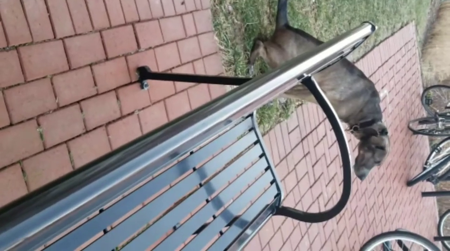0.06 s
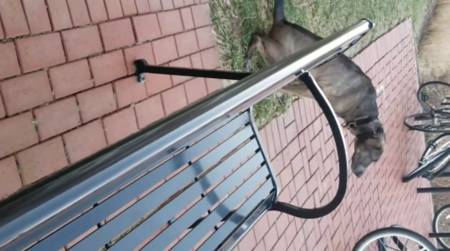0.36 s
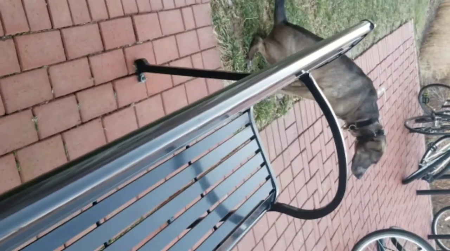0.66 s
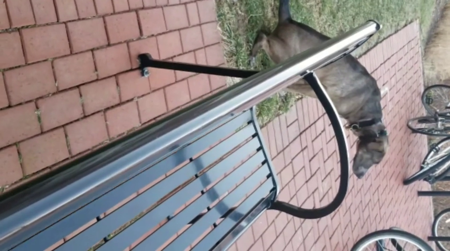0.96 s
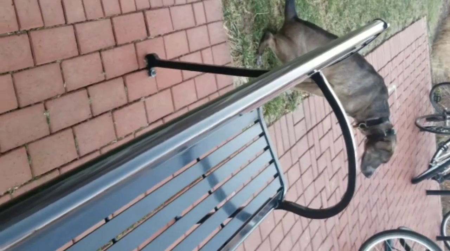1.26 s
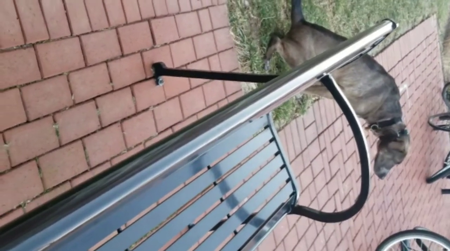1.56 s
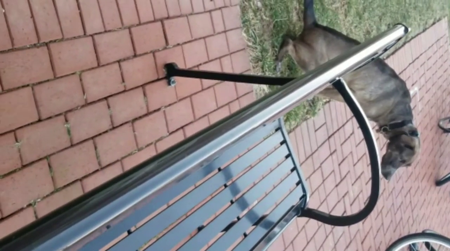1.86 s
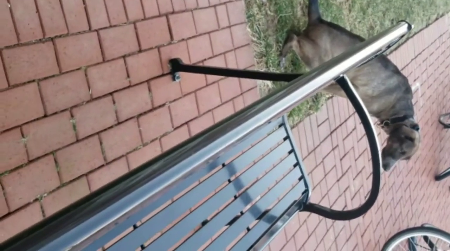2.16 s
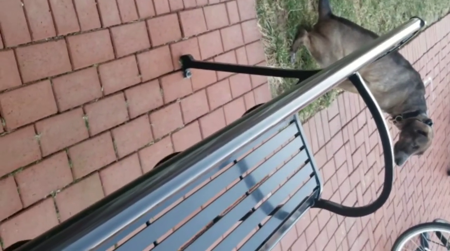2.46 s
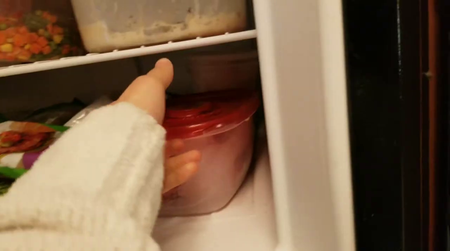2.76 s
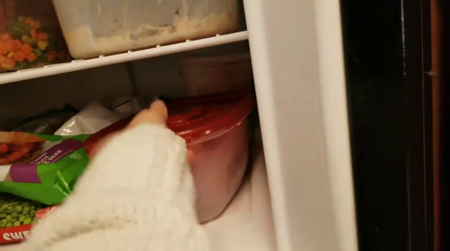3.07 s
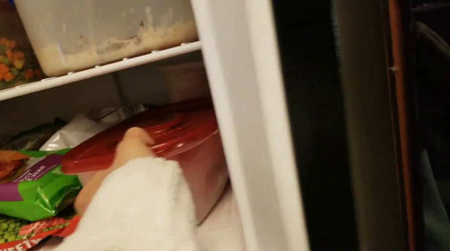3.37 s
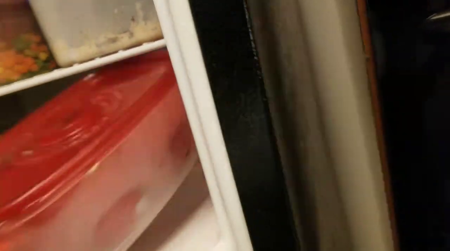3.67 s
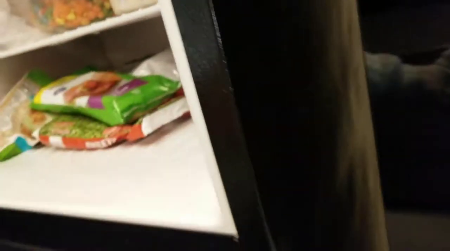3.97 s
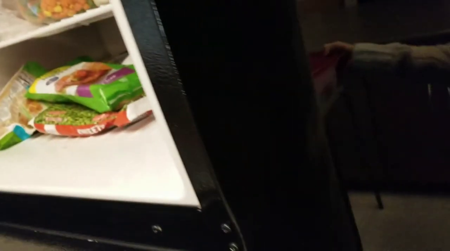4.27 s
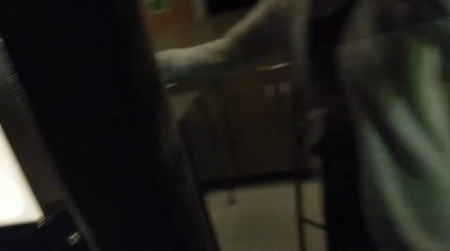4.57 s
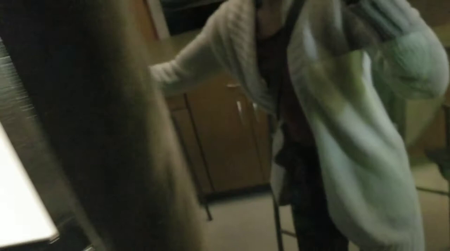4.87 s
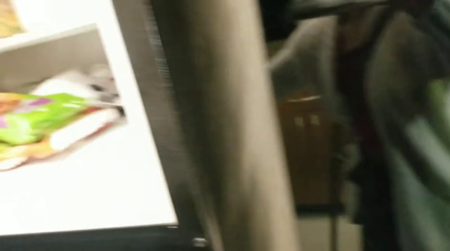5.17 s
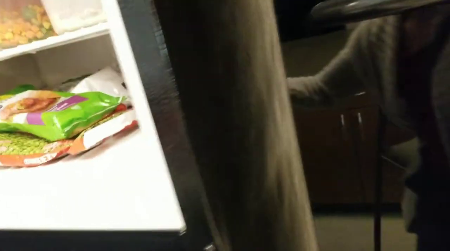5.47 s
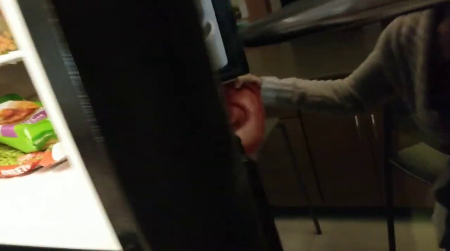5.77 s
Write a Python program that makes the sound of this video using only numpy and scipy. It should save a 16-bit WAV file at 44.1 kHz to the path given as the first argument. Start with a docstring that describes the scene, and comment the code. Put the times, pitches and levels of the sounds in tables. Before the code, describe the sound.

Low far-off traffic and a machine drone outdoors cut off suddenly. Next, straight ahead in a small kitchen, a plastic tub is tugged from an open, softly humming freezer, rasping past crackly food bags and banging hollowly on the way out. After a brief rustle it lands on a counter to the left, then sticks and slips through two squeaky pushes. The room adds a short echo.

```python
"""A plastic tub is worked loose from an open freezer, straight in front of the microphone in a small kitchen.
It drags past crinkling bags of frozen food and clatters on the frame while the compressor purrs.
Off to the left it is knocked down on a counter and pushed along, squeaking as it sticks and slips.
The room answers. Before all this comes a quiet yard, with distant traffic and a machine hum,
which stops abruptly just ahead of the kitchen."""
import sys
import numpy as np
from scipy import signal
from scipy.fft import rfft, irfft, next_fast_len
from scipy.io import wavfile
from scipy.ndimage import uniform_filter1d, map_coordinates

SR = 44100
rng = np.random.default_rng(int(sys.argv[2]) if len(sys.argv) > 2 else 0)


def output_pcm(signal):
    """Save a mono or channel-first signal as 16-bit PCM at the path in sys.argv[1].

    Samples are clipped to [-1, 1] before scaling.
    """
    pcm = np.clip(np.atleast_2d(signal).T, -1, 1) * 32767
    wavfile.write(sys.argv[1], SR, np.round(pcm).astype(np.int16))


N = 256662
TIME = np.arange(N) / SR
BRIEF = TIME[:SR // 2]

# Levels in the tables are relative; each source sets its own gain.
# Distant traffic and the freezer's fan: frequency_hz, density_db
TRAFFIC_SPECTRUM = [(13, -44.5), (22, -16.5), (85, -0.5), (128, -1.5), (180, -3.5), (270, -8.5), (302, -11),
                    (328, -9), (376, -12), (602, -16), (815, -14), (1970, -27), (3420, -47), (3920, -53),
                    (5930, -60), (16000, -57.5)]
FAN_SPECTRUM = [(15, -64.5), (25, -33.5), (92, -8.5), (105, -13), (123, -3), (206, -16), (236, -15.5),
                (270, -17), (317, -17), (427, -23.5), (962, -37), (1400, -47), (5280, -58.5),
                (16000, -52.5)]
# Likeness of the left and right microphones, outdoors and in: frequency_hz, correlation
YARD_COHERENCE = [(60, 0.99), (130, 0.97), (290, 0.85), (640, 0.27), (1410, -0.41), (3100, 0.33),
                  (6820, -0.13), (15000, 0.099)]
INDOOR_COHERENCE = [(100, 0.95), (300, 0.95), (700, 0.39), (1500, 0.23), (10000, 0)]
# Tones of the yard's machine, a thin far whine and the freezer's compressor: pitch_hz, level_db
MACHINE_TONES = [(118.4, -48), (301.5, -43)]
WHINE_TONES = [(1165, -67.5), (1207, -62)]
COMPRESSOR_TONES = [(118.4, -55.5), (242.2, -81.5), (323.0, -67), (855.9, -83.5)]
# Faint ticks, chirps and swells in the yard: centre_s, level_db, pitch_hz, half_width_hz, half_length_s
YARD_CHIRPS = [(0.216, -52, 11800, 3500, 0.0041), (0.215, -60.5, 4430, 1300, .005),
               (.49, -52, 1355, 111, 0.29), (0.627, -65, 3750, 700, 0.052), (2.231, -65, 4050, 397, 0.043)]
# The kitchen's reverberation: frequency_hz, t60_s
KITCHEN_DECAY = [(100, 0.44), (500, 0.36), (2000, 0.27), (8000, 0.21), (16000, .24)]
# Bags and sleeve settling: peak_s, level_db
RUSTLE_EVENTS = [(3.92, -58), (4.243, -61.5), (4.322, -64), (4.69, -61), (4.801, -53.5), (4.965, -55)]
# Their soft rustle: frequency_hz, density_db
RUSTLE_SPECTRUM = [(590, -12), (1000, 2.5), (1180, -6), (1730, -1), (1890, -2.5), (2100, -0.5), (2390, -2),
                   (5000, -8.5), (16000, -11.5)]
# The hand's tug, feel for a grip, nudge, long pull and lift: start_s, length_s, effort_db
HAND_PULLS = [(3.067, 0.043, -10), (3.127, .1, -28.5), (3.232, 0.094, -16.5), (3.373, 0.15, 1.5),
              (3.587, 0.11, -24.5)]
# Dragging: the tub's judder, its rasp on the shelf, the bags' crinkle: frequency_hz, density_db
JUDDER_SPECTRUM = [(26, -54), (45, -24.5), (74, -11), (91, 3.5), (109, 6), (150, -17.5), (300, -12),
                   (390, -41.5), (660, -120)]
RASP_SPECTRUM = [(130, -36), (220, -20), (379, 2.5), (524, -6.5), (805, -5), (1010, -8.5), (1110, -5.5),
                 (1440, -13.5), (1770, -9), (3500, -18.5), (4550, -47), (7700, -120)]
CRINKLE_SPECTRUM = [(1290, -33.5), (2200, -4.5), (3500, -5), (4960, -10), (7390, -9), (9410, -11.5),
                    (15100, -7), (16000, -20)]
# Pushes along the counter: start_s, length_s, final_force_db, squeal_db, slip_rate_hz, glide_hz_per_s
COUNTER_PUSHES = [(5.142, 0.14, 1, -40, 455, 660.5), (5.633, 0.16, -4, -42, 600, -100)]
# Groan and hiss of plastic on the counter: frequency_hz, density_db
GROAN_SPECTRUM = [(32, -21), (55, -12), (82, 8), (123, -4), (146, -10), (220, -5), (270, -3.5), (389, -8),
                  (424, -7.5), (484, -1.5), (560, -8), (611, -4), (843, -13.5), (1800, -13), (2340, -33),
                  (3960, -120)]
HISS_SPECTRUM = [(880, -44), (1500, -29), (2000, -5), (2510, -6), (3480, -5.5), (4970, -10.5), (6760, -15),
                 (12500, -18), (16000, -22)]
# Overtones of the plastic's stick-slip: harmonic_number, level_db
SQUEAL_HARMONICS = [(1, -0.5), (2, -14), (3, -9), (4, -8), (5, -1), (6, -11)]
# Single sharp slips of the plastic: start_s, level_db, pitch_hz
SHARP_SLIPS = [(5.1584, -22.5, 2250), (5.2814, -20, 2450), (5.6318, -37, 3300), (5.667, -33, 2970),
               (5.7393, -24, 3050), (5.764, -42, 3100), (5.7781, -28, 2400)]
# Modes of the freezer's cabinet, its wire shelf, the counter and the tub: pitch_hz, width_hz, level_db
CABINET_MODES = [(92, 29, -9.5), (114, 32, 6.5), (218, 51, -14), (325, 13, -7.5), (454, 49, -6.5),
                 (668, 44, -10.5)]
SHELF_MODES = [(880, 5, -2), (984, 8.1, -7), (1640, 4.8, -7), (2440, 6, -9)]
COUNTER_MODES = [(125, 30, 3.5), (187, 45, 1), (288, 130, -5), (605, 200, -18.5), (760, 13, -4)]
TUB_MODES = [(793, 31, 3.5), (960, 130, -7), (1638, 29, 3), (1854, 33, -2.5), (2120, 19, -22),
             (2540, 18, -14.5), (2900, 21, -22), (3275, 17, -19)]
# The crack at the point of contact: frequency_hz, density_db
CRACK_SPECTRUM = [(1470, -24.5), (2500, -13.5), (4440, 3), (5190, 1), (5920, -3), (7300, 0.5), (9360, -2),
                  (13200, -1.5), (16000, -2.5)]
# Blows of the tub: start_s, crack_db, thud_db, hollow_db, clack_db, clack_hz
TUB_BLOWS = [(3.063, -32, -68, -77, -50, 2660), (3.1558, -36.5, -52, -51, -42.5, 912),
             (3.2531, -36, -44, -46.5, -44, 877), (3.33, -38.5, -51, -58, -51, 1205),
             (3.4347, -30, -33, -37, -30.5, 1240), (3.4737, -32, -41, -35, -46, 1510),
             (3.5417, -32, -29, -34, -44, 1200), (3.5536, -61, -23.5, -33.5, -58, 1800),
             (3.669, -12, -19, -24.5, -22.5, 910), (3.679, -13.5, -25, -25, -29, 730),
             (3.6917, -16.5, -25, -23.5, -23.5, 790), (3.712, -18.5, -22, -15.5, -25, 1700),
             (3.7301, -21.5, -28, -16.5, -23.5, 810), (3.7681, -24, -53, -40, -40.5, 776),
             (3.8797, -35.5, -60, -57, -63, 830), (4.6827, -51.5, -36, -42.5, -52.5, 614),
             (4.7643, -24, -62, -43, -43, 3020), (4.7707, -37, -40.5, -44, -37, 605),
             (4.9651, -30, -24.5, -26, -43.5, 1530), (4.9862, -19, -22.5, -17.5, -29, 1400),
             (4.9973, -22, -44, -21, -30.5, 910), (5.019, -31, -21, -32, -36, 1120),
             (5.0408, -48, -25, -29, -41.5, 921), (5.1016, -27.5, -33, -32.5, -28.5, 770),
             (5.111, -40, -25.5, -28.5, -37.5, 774), (5.3709, -35.5, -38, -55, -53, 2730),
             (5.417, -44, -42, -51, -54, 2970), (5.441, -31, -41, -46, -38.5, 580)]

YARD_END_S, KITCHEN_START_S = 2.695, 3.03


def amp(db):
    """Decibels to gain."""
    return 10 ** (np.asarray(db) / 20)


def unit(x):
    """Scale to rms 1."""
    return x / np.sqrt(np.mean(x ** 2) + 1e-20)


def along(points, hz):
    """Read (frequency_hz, value) points on a log axis."""
    f, v = np.transpose(points)
    return np.interp(np.log(hz + 1), np.log(f + 1), v)


def wobble(rate):
    """A smooth random curve, rate knots a second."""
    return map_coordinates(rng.standard_normal(int(N * rate / SR) + 4), [TIME * rate])


def swell(start, hold, rise, fall):
    """A gain held at 1 from start for hold seconds; rise before and fall after in dB a second."""
    return amp(-rise * np.maximum(start - TIME, 0) - fall * np.maximum(TIME - start - hold, 0))


def filtered(x, response):
    """Pass x through a complex response of frequency."""
    n = x.shape[-1]
    m = next_fast_len(n + SR // 4)
    return irfft(rfft(x, m) * response(np.fft.rfftfreq(m, 1 / SR)), m)[..., :n]


def resonances(modes, f):
    """The causal response of (pitch_hz, width_hz, level_db) modes at frequencies f."""
    return sum(amp(db) * 1j * f * width / (hz * hz - f * f + 1j * f * width) for hz, width, db in modes)


def band(lo_hz, hi_hz, f):
    """A causal band-pass response at frequencies f."""
    b, a = signal.butter(3, [lo_hz, hi_hz], btype="band", analog=True)
    return signal.freqs(b, a, f)[1]


def add(track, s, x):
    """Mix x into the track at time s."""
    part = track[..., round(s * SR):][..., :x.shape[-1]]
    part += x[..., :part.shape[-1]]


def panned(x, pan_db):
    """Make the left louder than the right by pan_db."""
    return x * amp(np.array([[.5], [-.5]]) * pan_db)


def from_left(x, lag_ms):
    """Sound from the left reaches the right microphone later."""
    return filtered(x, lambda f: np.exp(1j * np.pi * f * lag_ms / 1000 * np.array([[1], [-1]])))


def mid_side(coherence, hz):
    """Mid and side gains that give the two microphones this likeness."""
    turn = np.arccos(np.clip(along(coherence, hz), -1, 1)) / 2
    return np.array([np.cos(turn), np.sin(turn)])


def rush(spectrum, coherence, grit=1):
    """Stereo noise of rms 1; grit gates the excitation before it is coloured."""
    colour = lambda hz: amp(along(spectrum, hz)) * mid_side(coherence, hz)
    mid, side = filtered(grit * rng.standard_normal((2, N)), colour)
    return unit(np.array([mid + side, mid - side]))


def tones(lines, drift_rad, flutter_db):
    """Steady machine tones that wander a little in phase and level."""
    out = np.zeros(N)
    for hz, db in lines:
        level = np.sqrt(2) * amp(db + flutter_db * wobble(6.1))
        out += level * np.sin(2 * np.pi * hz * TIME + drift_rad * wobble(2.7))
    return out


def friction(spectrum, slips_per_s, spread_db, snaps_per_s=0, flex_db=4.5):
    """Countless little slips of uneven strength, with a few sharper snaps."""
    slips = amp(1.7 * spread_db * np.tanh(wobble(slips_per_s) / 2))
    impulses = (rng.random(N) < snaps_per_s / SR) * rng.uniform(1, 2.7, N)
    snaps = signal.fftconvolve(impulses, np.exp(-BRIEF / 0.00092))[:N]
    rub = signal.stft(rush(spectrum, INDOOR_COHERENCE, slips + snaps), nperseg=512)[2]
    # as the plastic flexes, its resonances come and go
    flex = uniform_filter1d(rng.standard_normal(rub.shape[1:]), size=7, axis=0)
    flex = unit(uniform_filter1d(flex, size=4, axis=1))
    return unit(signal.istft(rub * amp(flex_db * flex), nperseg=512)[1][:, :N])


def burst(t60, response, apart, snap):
    """A snap and its dying rattle; apart is the share that differs between the microphones."""
    noise = rng.standard_normal(len(BRIEF)) + apart * rng.standard_normal((2, len(BRIEF)))
    force = amp(-60 * BRIEF / max(t60, .002)) + snap * np.exp(-BRIEF / 0.0025)
    return unit(filtered(noise * force, response)) * np.sqrt(.01 / BRIEF[-1])  # energy of 10 ms at rms 1


def yard():
    """Outdoors: far traffic, a humming machine, a thin whine swelling once, insects and faint chirps."""
    def narrow(hz, width):
        return unit(filtered(rng.standard_normal((2, N)), lambda f: np.exp(-((f - hz) / width) ** 2)))

    traffic = amp(-35.5 + 0.66 * wobble(8.2)) * rush(TRAFFIC_SPECTRUM, YARD_COHERENCE)
    hum = tones(MACHINE_TONES, drift_rad=0.057, flutter_db=1.5)
    whine = swell(0.42, 1.05, rise=35, fall=14.1) * tones(WHINE_TONES, drift_rad=1, flutter_db=6.5)
    insects = amp(-75.5 + 1.1 * wobble(11)) * narrow(3900, 170)
    air = traffic + hum + from_left(whine, lag_ms=0.36) + insects
    for s, db, hz, width, length in YARD_CHIRPS:
        air += amp(db) * narrow(hz, width) * np.exp(-((TIME - s) / length) ** 2)
    return panned(air, pan_db=-1.07) * np.clip((YARD_END_S - TIME) / 0.012, 0, 1)


def kitchen_reverb(x):
    """The small room's diffuse answer, alike at both microphones only in the bass."""
    hz, t, noise = signal.stft(rng.standard_normal((2, SR // 2)), SR, nperseg=256)
    hz = hz[:, None]
    dying = noise * amp(-60 * t / along(KITCHEN_DECAY, hz)) * mid_side(INDOOR_COHERENCE, hz)
    onset = 1 - np.exp(-BRIEF / 0.0025)
    mid, side = signal.istft(dying, SR, nperseg=256)[1][:, :len(BRIEF)] * onset
    tail = np.array([mid + side, mid - side])
    return signal.fftconvolve(x, tail / np.linalg.norm(tail[0]), axes=1)[:, :N]


def freezer():
    """In front of the microphone, the compressor purrs steadily under its fan."""
    compressor = amp(1) * tones(COMPRESSOR_TONES, drift_rad=.25, flutter_db=1.5)
    fan = amp(-52.5) * rush(FAN_SPECTRUM, INDOOR_COHERENCE)
    return (compressor + fan) * np.clip((TIME - KITCHEN_START_S) / 0.13, 0, 1)


def rustles():
    """Bags and sleeve stir briefly and settle."""
    stir = sum(amp(db) * swell(s, 0, rise=396, fall=155.5) for s, db in RUSTLE_EVENTS)
    return stir * friction(RUSTLE_SPECTRUM, 710, spread_db=1.9, snaps_per_s=54)


def tub_drag():
    """In front, one effort makes the tub judder and rasp over the frosty shelf and brush the bags."""
    def pulling(fall):
        return np.max([amp(db) * swell(s, length, 323, fall) for s, length, db in HAND_PULLS], axis=0)

    effort = pulling(fall=333)
    shaking = pulling(fall=48) ** 1.8  # grows faster than the effort and outlasts it
    loose = amp(np.interp(TIME, [3.07, 3.42], [-8, 0]))  # the tub comes free of the frost
    judder = amp(-36.5) * loose * friction(JUDDER_SPECTRUM, 40, spread_db=.8, flex_db=0.5)
    rasp = amp(-40) * np.sqrt(loose) * friction(RASP_SPECTRUM, 250, spread_db=2.2, snaps_per_s=25)
    crinkle = amp(-39.5) * friction(CRINKLE_SPECTRUM, 1700, spread_db=1.6, snaps_per_s=18)
    fade_in = np.clip((TIME - KITCHEN_START_S) / .03, 0, 1) ** 2
    return panned(shaking * judder + effort * (rasp + crinkle), pan_db=0.5) * fade_in


def squeal(s, slip_rate_hz, glide_hz_per_s):
    """Stick-slip of the plastic, gliding in pitch from time s; uneven slips widen its lines."""
    rate = (slip_rate_hz + glide_hz_per_s * np.clip(TIME - s, 0, .25)) * (1 + .04 * wobble(450))
    phase = 2 * np.pi * np.cumsum(rate) / SR
    harmonics = sum(amp(db) * np.sin(k * phase) for k, db in SQUEAL_HARMONICS)
    return unit(amp(4.7 * wobble(160)) * harmonics)


def tub_push():
    """To the left, plastic sticks and slips on the counter: rumble, groan, hiss, squeal and squeaks."""
    landing_s, rise, fall, build_rate = 5.05, 800, 208, 27  # rates in dB a second
    gliding = swell(landing_s, 1, rise, fall)
    pressing = sliding = amp(-18) * gliding  # a light force all along
    shrill = np.zeros((2, N))
    for s, length, force_db, squeal_db, slip_rate_hz, glide in COUNTER_PUSHES:
        build = amp(force_db - build_rate * np.maximum(s + length - TIME, 0))
        force = build * swell(s, length, rise, fall)
        pressing = np.maximum(pressing, force)
        # the tub slides on as the force lets go
        sliding = np.maximum(sliding, build * swell(s, length + 0.051, rise, fall=380))
        shrill += amp(squeal_db) * force ** 1.84 * squeal(s, slip_rate_hz, glide)
    for s, db, hz in SHARP_SLIPS:
        squeak = lambda f: resonances([(hz, 600, 0)], f) ** 2 + amp(-24.5)
        add(shrill, s, amp(db - 13) * burst(0.0085, squeak, apart=0.91, snap=.3))
    hiss = amp(-43) * sliding * friction(HISS_SPECTRUM, 500, spread_db=2.2, snaps_per_s=15)
    groan = amp(-38.5) * pressing ** .8 * friction(GROAN_SPECTRUM, 120, spread_db=2.5, flex_db=2)
    board = lambda f: resonances(COUNTER_MODES, f) * band(60, 330, f)
    jolt = amp(-36) * swell(landing_s, 0, rise, fall=73)
    rumble = (amp(-50.5) + jolt) * gliding * unit(filtered(rng.standard_normal(N), board))
    return from_left(groan + rumble + hiss + panned(shrill, pan_db=-6), lag_ms=0.364)


def blow(support, crack_db, thud_db, hollow_db, clack_db, clack_hz, pan_db):
    """The tub thuds and booms on what it hits, clacks in its own walls and cracks at the contact."""
    medium_db = -35
    rattle_s = 0.068 * 2 ** ((crack_db - medium_db) / 18)  # harder blows rattle longer
    focus_db = 5.5 - 0.37 * (clack_db - medium_db)  # a light tap favours the spot it touches
    wall_modes = TUB_MODES + [(clack_hz, 220, focus_db), (1300, 600, -9)]
    walls = lambda f: (resonances(wall_modes, f) + amp(-4)) * band(min(720, .76 * clack_hz), 3100, f)
    body = lambda f: (resonances(support, f) + amp(-21.5)) * band(175, 780, f)
    contact = lambda f: amp(along(CRACK_SPECTRUM, f))
    ring = sum(amp(db) * np.sin(2 * np.pi * hz * BRIEF) * np.exp(-np.pi * width * BRIEF)
               for hz, width, db in support)
    thud = amp(thud_db - 3.5) * filtered(ring, lambda f: band(74, 220, f))
    hollow = amp(hollow_db - 4) * burst(rattle_s, body, apart=0.32, snap=0.39)
    clack = amp(clack_db + 2.5) * burst(rattle_s * 0.95, walls, apart=0.98, snap=0.4)
    crack = amp(crack_db - 8) * burst(rattle_s * 1.1, contact, apart=2.3, snap=.6)
    return thud + hollow + panned(clack + crack, pan_db)


def tub_knocks():
    """The tub strikes the freezer in front, setting its wire shelf singing, then the counter aside."""
    out = np.zeros((2, N))
    for s, *strike in TUB_BLOWS:
        if s < 4.5:  # still at the freezer
            hit = blow(CABINET_MODES, *strike, pan_db=0.5)
            hit += amp(2) * filtered(hit, lambda f: resonances(SHELF_MODES, f))
        else:
            hit = blow(COUNTER_MODES, *strike, pan_db=-2)
        add(out, s, from_left(hit, lag_ms=np.interp(s, [3.3, 3.9], [.08, .37])))
    return out


def scene():
    """The yard, then the kitchen, where knocks and pushes stir the room."""
    knocks, pushes = tub_knocks(), tub_push()
    direct = yard() + freezer() + tub_drag() + rustles() + knocks + pushes
    return direct + kitchen_reverb(amp(-9) * knocks + amp(-11) * pushes)


def record(dry):
    """The camera's stereo microphone keeps nothing above its band limit."""
    top_hz = 16000
    return filtered(dry, lambda hz: 1 / np.sqrt(1 + (hz / top_hz) ** 160))


dry = scene()
out = record(dry)
output_pcm(out)
```